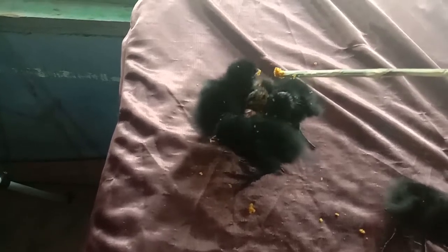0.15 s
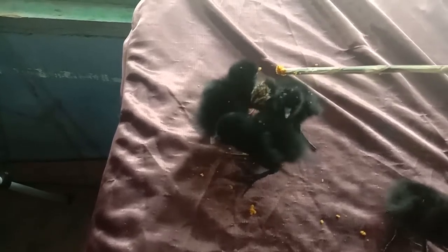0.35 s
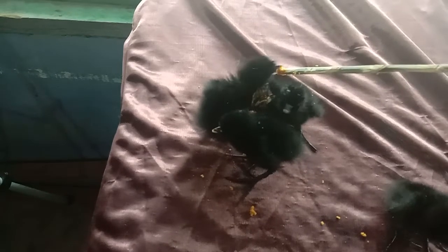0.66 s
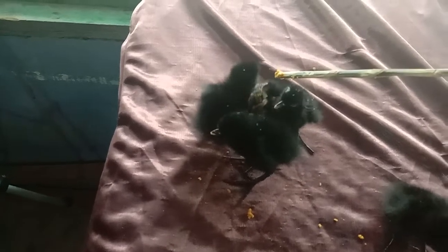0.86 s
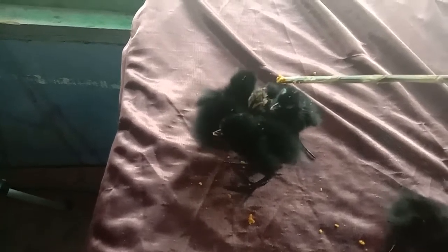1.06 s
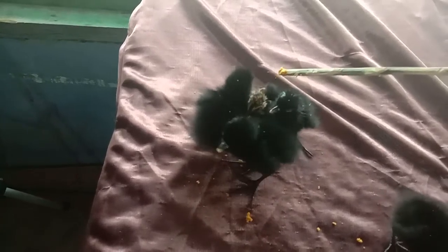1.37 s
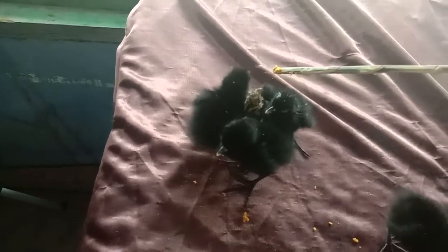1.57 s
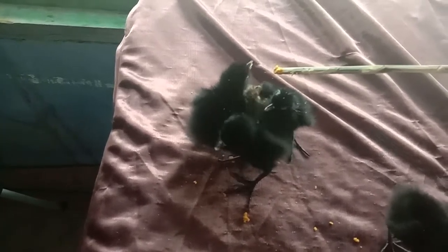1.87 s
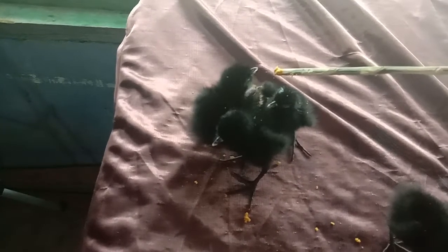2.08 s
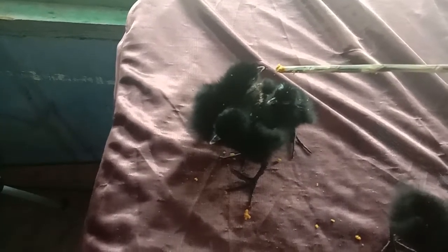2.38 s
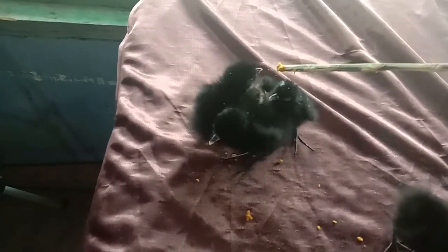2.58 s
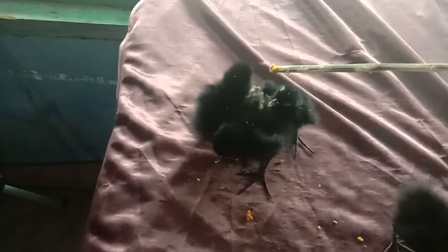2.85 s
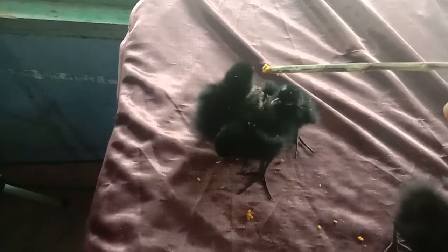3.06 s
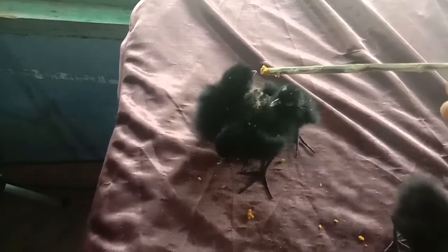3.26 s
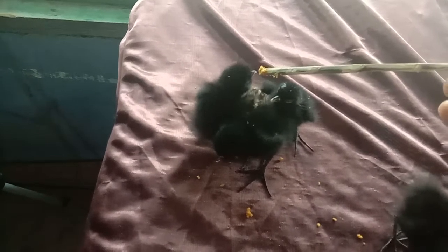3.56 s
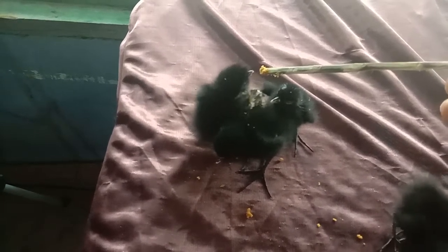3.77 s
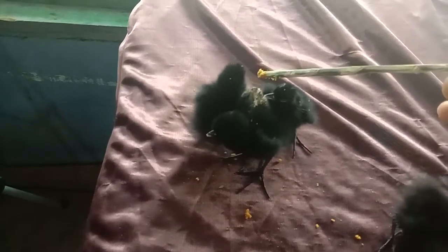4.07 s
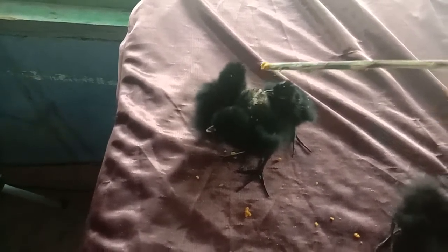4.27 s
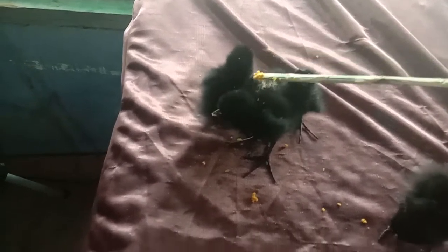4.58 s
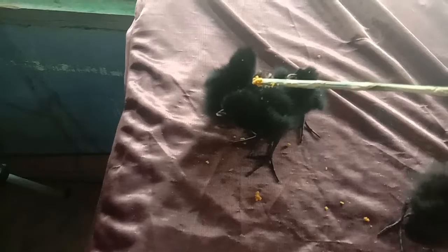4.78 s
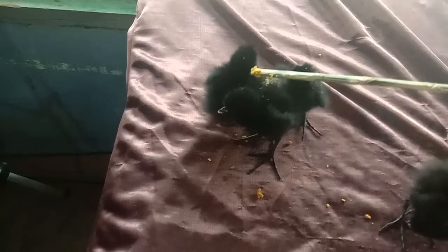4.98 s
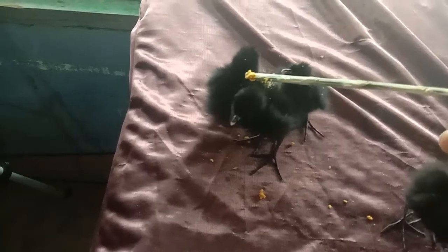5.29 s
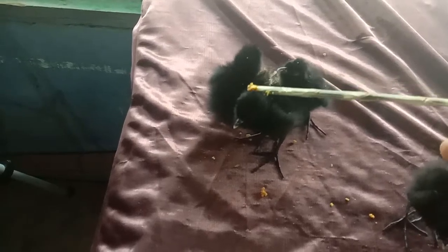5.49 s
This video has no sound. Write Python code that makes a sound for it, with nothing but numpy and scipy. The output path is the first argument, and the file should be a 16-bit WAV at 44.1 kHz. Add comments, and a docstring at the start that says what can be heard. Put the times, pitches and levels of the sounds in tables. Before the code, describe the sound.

High, sharp peeps from baby chicks carry on throughout, heard close up in a room. Loud falling calls come about once a second, singly or in small clusters, while quieter cheeps answer from slightly further off. Underneath are light shuffling and scratching on cloth, a faint throbbing hum and a dim, restless distant noise.

```python
"""Indoors, close to a phone, black hatchling chicks huddle on a cloth and beg for food.
Each peep is a whistle from a chick's voice box: it shoots up, peaks and sinks, turning raspy as it falls.
Soft cheeps and thin whistles fill the gaps, and feet and down rustle on the cloth.
Under them lie room rumble, a throbbing hum, a restless far-off din and a few faint low tones."""
import sys
import numpy as np
from scipy import signal
from scipy.fft import rfft, irfft
from scipy.io import wavfile
from scipy.ndimage import uniform_filter1d

SR = 44100
rng = np.random.default_rng(int(sys.argv[2]) if len(sys.argv) > 2 else 0)


def wav_record(signal):
    """Record a signal, one row per channel, as 16-bit PCM in the file named by sys.argv[1]."""
    frames = np.transpose(np.atleast_2d(signal))
    bounded = np.clip(frames, -1, 1)
    # unit amplitude maps onto the largest positive 16-bit level
    quanta = np.round(bounded * 32767).astype(np.int16)
    wavfile.write(sys.argv[1], SR, quanta)


N = 248724
TIME = np.arange(N) / SR
DROP_S = 0.028  # the quick fall that ends every peep
CLEAR_BEFORE_S, CLEAR_AFTER_S = 0.014, 0.035  # the voice is clean this long around its highest pitch


def undb(db):
    """Turn decibels into a gain to multiply by."""
    return 10 ** (np.asarray(db) / 20)


def unit(x):
    """Scale a signal to an average (rms) level of 1."""
    return x / np.sqrt(np.mean(x ** 2) + 1e-20)


def walk(rate):
    """A smooth random wander of size about 1; a higher rate [Hz] wanders faster."""
    spectrum = rfft(rng.standard_normal(N)) * np.exp(-(np.fft.rfftfreq(N, 1 / SR) / rate) ** 2)
    return unit(irfft(spectrum, N))


def gate(t, start, end, edge):
    """1 between start and end, 0 outside, with soft edges."""
    return np.sin(np.pi / 2 * np.clip(np.minimum(t - start, end - t) / edge, 0, 1)) ** 2


def arch(t, start, end):
    """An arch that rises from 0 to 1 and back between start and end."""
    return np.sin(np.pi * np.clip((t - start) / (end - start), 0, 1))


def bump(t, centre, width):
    """A bell-shaped curve of height 1."""
    return np.exp(-((t - centre) / width) ** 2)


def span(start, end):
    """The sample numbers and times of one call."""
    i = np.arange(max(int(start * SR), 0), min(int(end * SR), N))
    return i, TIME[i]


def noise_band(hz, width):
    """Noise around one pitch, passed twice through a resonance, at level 1."""
    b, a = signal.iirpeak(hz, hz / width, fs=SR)
    return unit(signal.lfilter(b, a, signal.lfilter(b, a, rng.standard_normal(N))))


def air(rumble_db=-59, hiss_db=-73):
    """Steady room rumble and a very faint hiss."""
    # tone colour of the rumble: (frequency [Hz], relative level [dB])
    rumble_shape = [(18, -50), (30, -66), (97, 6.5), (389, -11), (667, -15), (962, -9.5), (1240, -13.5),
                    (3000, -48), (3900, -53), (6600, -120)]
    hz, db = np.transpose(rumble_shape)
    f = np.fft.rfftfreq(N, 1 / SR) + 1
    colour = undb(np.interp(np.log(f), np.log(hz), db)) / (1 + (f / 3500) ** 4)
    hiss = undb(hiss_db) * rng.standard_normal(N)
    rumble = unit(irfft(rfft(rng.standard_normal(N)) * colour, N))
    return undb(rumble_db) * rumble + hiss


def hum(throb_db=-56, steady_db=-64, noise_db=-62):
    """A low hum that throbs unevenly about eight times a second."""
    beat = (1 + np.cos(2 * np.pi * 8.2 * TIME + .3 * walk(2))) ** 2
    throb = unit(beat * undb(3 * walk(7)) * np.sin(2 * np.pi * 92 * TIME + 1.5 * walk(7)))
    steady = np.sqrt(2) * np.sin(2 * np.pi * 101 * TIME + 0.89 * walk(5.1))
    return undb(throb_db) * throb + undb(steady_db) * steady + undb(noise_db) * noise_band(92.6, 158)


def lull():
    """A gain that dips briefly a few times, for the din and the shuffling."""
    # quiet moments: (time [s], half width [s], depth [dB])
    dips = [(2.15, .1, 1), (2.88, 0.026, 2.5), (3.372, 0.057, 6.5)]
    return undb(-sum(db * bump(TIME, time, width) for time, width, db in dips))


def swell(start, length, edge_s=0.0084):
    """The soft rise, hold and fall of one swell of the din."""
    return gate(TIME, start - edge_s, start + length + edge_s, 1.29 * edge_s)


def din(low_db=-57, high_db=-54, restless_db=3.5, low_swell_db=-1, high_swell_db=-3):
    """Far-off noise that swells in a low and a high group of flickering bands."""
    # noise bands of each group: (pitch [Hz], base width [Hz], relative level [dB])
    low_bands = [(499, 39, -7.5), (598.3, 37, 4.5), (676.6, 20, 3), (749.5, 19, 5.5), (877, 15.6, 4)]
    high_bands = [(1077, 53, -4), (1233, 67, 4.5), (1337, 32, -1.5), (1455, 89, 2), (1715, 99, -5.5),
                  (1845, 73, -1.5), (1955, 35, -18.5), (2080, 15, -6)]
    # swells of the low group: (start [s], length [s], relative level [dB], centre [Hz])
    low_swells = [(0.501, 0.044, -46, 577), (0.572, 0.032, -45, 660), (0.732, 0.065, -47.5, 750),
                  (0.783, 0.027, -47, 680), (0.948, 0.048, -45.5, 606), (1.225, 0.14, -44.5, 743),
                  (1.837, 0.04, -45, 795), (1.945, 0.092, -44, 663), (2.441, 0.067, -45, 696),
                  (2.692, 0.039, -43.5, 810), (3.426, 0.046, -46.5, 587), (3.599, 0.041, -47, 780),
                  (3.721, 0.037, -48, 627), (3.866, 0.054, -47, 677), (4.031, 0.03, -48, 800),
                  (4.131, 0.034, -45.5, 610), (4.417, 0.027, -46.5, 670), (4.498, 0.039, -46.5, 690),
                  (4.739, 0.051, -45.5, 615), (4.793, 0.065, -50.5, 564), (5.037, 0.043, -45.5, 620),
                  (5.331, 0.082, -47.5, 783), (5.417, 0.079, -46, 800)]
    # swells of the high group: (start [s], length [s], relative level [dB])
    high_swells = [(0.052, 0.038, -44.5), (0.582, 0.061, -42), (1.196, 0.043, -39.5), (1.555, 0.091, -45),
                   (1.66, 0.068, -43), (1.833, 0.072, -44.5), (2.375, 0.098, -46), (2.575, 0.071, -44),
                   (2.76, 0.054, -44.5), (3.575, 0.027, -39.5), (3.818, 0.038, -46), (4.003, 0.03, -41.5),
                   (4.072, 0.04, -44), (4.241, 0.043, -43.5), (4.342, 0.035, -42.5), (4.548, 0.026, -43.5),
                   (5.069, 0.04, -43.5), (5.283, 0.1, -44), (5.385, 0.044, -45), (5.46, 0.049, -51),
                   (5.606, 0.05, -40.5)]
    low, high = (undb(db + restless_db * walk(17.3)) * lull() for db in (low_db, high_db))
    centre_hz = 670 + 65 * walk(2.7)  # bands near this drifting centre stand out in the low group
    for start, length, db, hz in low_swells:
        on = swell(start, length)
        low = np.maximum(low, undb(db + low_swell_db) * on)
        centre_hz = centre_hz + on * (hz - centre_hz)
    for start, length, db in high_swells:
        high = np.maximum(high, undb(db + high_swell_db) * swell(start, length))
    out = 0
    for bands, gain, focus_hz, reach_hz in ((low_bands, low, centre_hz, 170), (high_bands, high, 1300, 1500)):
        body = 0
        for hz, width, db in bands:
            flicker = undb(db + 5.5 * walk(12)) / (1 + ((hz - focus_hz) / reach_hz) ** 4)
            body += flicker * noise_band(hz, 1.6 * width)
        # the bands trade energy while their sum follows the swell
        power = uniform_filter1d(body ** 2, size=2000)
        out += body / np.sqrt(power) * gain
    return out


def low_tones(sag=0.04):
    """Faint, unsteady tones that swell, sink a little and fade."""
    # the tones: (start [s], length [s], middle pitch [Hz], level [dB])
    tones = [(4.49, .14, 376, -44), (4.65, .14, 358, -49), (.46, .14, 510, -49), (.94, .07, 620, -44),
             (4.79, .11, 355, -54), (4.535, .07, 1100, -45), (4.75, .18, 586, -47), (5.04, .27, 140, -45),
             (5.02, .2, 232, -53), (5.08, .25, 195, -55)]
    out, flicker, waver = np.zeros(N), walk(33), walk(53)
    for start, length, hz, db in tones:
        pitch = hz * np.interp(TIME, [start, start + length], [1 + sag, 1 - sag])
        phase = 2 * np.pi * np.cumsum(pitch) / SR + waver / 2
        fade = gate(TIME, start, start + length, length / 3)
        out += np.sqrt(2) * undb(db + 2 * flicker) * fade * np.sin(phase)
    return out


def rustle(shuffle_db=-53.5, chatter_db=-58):
    """Chicks shuffle in random fits and scratch the cloth, with thin far-off cheeping behind."""
    # feet and down on the cloth: (middle time [s], length [s], centre [Hz], level [dB])
    scratches = [(1.645, 0.082, 3980, -47.5), (2.037, 0.038, 10300, -54.5), (2.136, 0.034, 5360, -55.5),
                 (3.48, 0.069, 4600, -52.5), (5.034, 0.034, 3820, -51.5), (5.087, 0.043, 6000, -47.5)]
    out = 0
    for hz in np.geomspace(2100, 14500, num=22):
        patches_db = 5.5 * walk(20)
        colour_db = -np.log2(hz / 2000) - 10 * (hz > 10500)  # higher bands are weaker
        out += undb(patches_db + colour_db) * noise_band(hz, hz / 10)
    crackle = undb(2.6 * walk(140))
    activity = undb(shuffle_db + 2 * walk(32)) * lull()
    out = unit(out * crackle) * activity
    grain = unit(undb(2 * walk(400)))
    for time, length, hz, db in scratches:
        fade = gate(TIME, time - length / 2, time + length / 2, length / 3)
        out += undb(db) * fade * grain * noise_band(hz, hz / 4)
    chatter = sum(noise_band(hz, 110) * undb(6 * walk(7)) for hz in (3350, 3650, 3800))
    return out + undb(chatter_db) * unit(chatter * activity)


def room(x, tail_db=-27, ring_s=0.25):
    """Sound bounces off nearby surfaces, then dies away in a short tail."""
    # close echoes: (delay [s], level [dB])
    echoes = [(.0023, -31), (.0061, -13), (0.0114, -11)]
    t = TIME[:SR // 2]
    tail = rng.standard_normal(len(t)) * undb(-60 * t / ring_s) * (t > .008)
    response = undb(tail_db) * tail / np.sqrt(np.sum(tail ** 2))
    for delay, db in echoes:
        response[int(delay * SR)] += undb(db)
    return x + signal.fftconvolve(x, response)[:N]


def soft_calls(calls, hoarse, gain_db, ends_db=-6.5):
    """Quiet calls with the beak nearly shut: a lone tone that breaks up when hoarse."""
    out, jitter, catch = np.zeros(N), walk(224), walk(20)
    for start, length, first_hz, last_hz, arch_hz, loudest, db in calls:
        end = start + length
        i, t = span(start, end)
        hz = np.interp(t, [start, end], [first_hz, last_hz]) + arch_hz * arch(t, start, end)
        phase = 2 * np.pi * np.cumsum(hz) / SR + hoarse * jitter[i]
        fade_db = np.interp(t, [start, start + length * loudest, end], [ends_db, 0, ends_db])
        size = np.sqrt(2) * gate(t, start, end, 0.0067) * undb(db + fade_db)
        out[i] += size * undb(7.4 * hoarse * catch[i]) * np.sin(phase)
    return undb(gain_db) * out


def peep_pitch(t, times, pitches, rest_hz=2480, half_step_s=0.0086):
    """The pitch climbs from rest to a peak, sags with one sudden step down, and drops back."""
    start, peak, step, end = times
    top_hz, end_hz, step_hz, climb_hz, sag_hz = pitches
    hz = np.interp(t, [start, peak, end, end + DROP_S],
                   [rest_hz, top_hz, end_hz + step_hz, rest_hz + step_hz])
    hz += climb_hz * arch(t, start, peak) + sag_hz * arch(t, peak, end)
    hz -= step_hz * (1 + np.tanh((t - step) / half_step_s)) / 2
    return uniform_filter1d(hz, size=570, mode="nearest")  # round off the corners


def peep_levels(t, times, levels, hz, onset_db=-49.5, cutoff_db=-63, pure_s=0.019):
    """Strength of the whistle and its octave: pressure builds in the climb and holds into the drop."""
    # how the throat colours the octave (twice the pitch): (frequency [Hz], gain [dB])
    throat = [(4500, 5), (6000, -4), (7300, 3.5), (8200, -0.5), (9000, 6), (9700, -0.5), (10500, 1)]
    start, peak, _, end = times
    peak_db, mid_db, end_db, climb_octave_db, sag_octave_db = levels
    climb = np.interp(t, [start, peak], [1, 0])
    sag = np.interp(t, [peak, end], [0, 1])
    drop = np.interp(t, [end, end + DROP_S], [0, 1])
    whistle_db = np.interp(t, [peak, (peak + end) / 2, end], [peak_db, mid_db, end_db])
    whistle_db += (onset_db - peak_db) * climb ** 0.95 + (cutoff_db - end_db) * drop ** 2.1
    octave_db = np.interp(t, [peak, peak + CLEAR_AFTER_S], [climb_octave_db, sag_octave_db])
    octave_db += np.interp(2 * hz, *np.transpose(throat))
    octave_db -= 6.5 * climb + 7.5 * sag + 3.5 * drop  # weaker towards both ends
    octave_db -= 8 * bump(t, peak + pure_s / 2, pure_s)  # a pure moment as the pitch turns over
    fade = np.sqrt(2) * gate(t, start, end + DROP_S, 0.006)
    return fade * undb(whistle_db), fade * undb(octave_db)


def roughness(t, peak, rasp_db, early_db=-3, grow_s=0.095, half_pitch_db=-18):
    """Amounts of rasp and half pitch: rough in the climb, clean at the peak, rougher through the sag."""
    # the voice slips into half pitch: (start [s], length [s], strength [dB])
    slips = [(.005, .025, -24), (2.33, .03, -24), (4.22, .11, -24)]
    early = (t > peak) * np.clip(1 - (t - peak - CLEAR_AFTER_S) / grow_s, 0, 1)
    clean = gate(t, peak - CLEAR_BEFORE_S, peak + CLEAR_AFTER_S, 0.0053)
    rasp = undb(rasp_db + early_db * early) * (1 - clean)
    slipping = sum(undb(db) * gate(t, start, start + length, 0.001) for start, length, db in slips)
    return rasp, undb(half_pitch_db) * rasp + slipping


def peeps(flutter_hz=788, wobble_hz=30.75, third_db=-20, fourth_db=-42):
    """The voice box whistles with a strong octave; its two sides beat, and it slips into half pitch."""
    # loud peeps: (start [s], peak [s], step down [s], end of sag [s],
    #   peak pitch [Hz], end pitch [Hz], step size [Hz], arch of climb [Hz], arch of sag [Hz],
    #   peak level [dB], midway level [dB], end level [dB],
    #   base octave level in climb [dB], base octave level in sag [dB], rasp [dB])
    calls = [(-0.124, -0.035, 0.054, 0.07, 4240.0, 3690.0, 140.0, -80.0, 180.0, -32.0, -30.0, -25.0, -45.0, -36.0, -27.0),
             (0.292, 0.359, 0.373, 0.546, 5440.0, 3540.0, 250.0, 210.0, -260.0, -24.0, -25.0, -37.0, -39.0, -45.0, -23.0),
             (0.302, 0.426, 0.443, 0.526, 5080.0, 4390.0, 610.0, 580.0, 90.0, -25.0, -33.0, -32.0, -58.0, -65.0, -18.0),
             (0.541, 0.59, 0.692, 0.828, 4190.0, 3060.0, 260.0, 380.0, 140.0, -31.0, -32.0, -50.0, -53.0, -38.0, -23.0),
             (1.386, 1.449, 1.48, 1.595, 5430.0, 3550.0, 350.0, -260.0, -80.0, -19.0, -25.0, -36.0, -37.0, -34.0, -19.0),
             (2.269, 2.315, 2.349, 2.428, 4560.0, 3890.0, 130.0, -40.0, 50.0, -27.0, -25.0, -27.0, -56.0, -35.0, -23.0),
             (2.596, 2.658, 2.682, 2.816, 5260.0, 3550.0, 550.0, -250.0, 40.0, -20.0, -28.0, -43.0, -34.0, -32.0, -18.0),
             (3.015, 3.075, 3.205, 3.212, 4450.0, 4170.0, 210.0, 180.0, 40.0, -41.0, -35.0, -34.0, -66.0, -67.0, -22.0),
             (3.859, 3.93, 3.944, 4.107, 5320.0, 3950.0, 290.0, -300.0, -50.0, -21.0, -36.0, -37.0, -35.0, -37.0, -21.0),
             (4.064, 4.154, 4.269, 4.348, 4900.0, 3580.0, 0.0, 80.0, -190.0, -33.0, -31.0, -36.0, -45.0, -41.0, -24.0),
             (4.166, 4.208, 4.272, 4.305, 4340.0, 3720.0, 130.0, 10.0, -50.0, -33.0, -29.0, -33.0, -58.0, -40.0, -28.0),
             (4.504, 4.556, 4.642, 4.71, 4750.0, 3630.0, 110.0, 390.0, -30.0, -27.0, -31.0, -36.0, -54.0, -46.0, -19.0),
             (5.147, 5.208, 5.239, 5.361, 5230.0, 3510.0, 480.0, -170.0, 260.0, -19.0, -21.0, -37.0, -34.0, -30.0, -23.0)]
    out = np.zeros(N)
    flutter = 2 * undb(1.5) * np.cos(2 * np.pi * flutter_hz * TIME + 2.3 * walk(80))  # the two sides beat
    wobble = wobble_hz * walk(23.2)
    shimmer, jitter = flutter + walk(900), .7 * walk(900)
    tremor, waver = walk(130), walk(110)
    overtone_flicker = undb(1.8 * walk(140) + .7 * walk(60))
    for row in calls:
        times, pitches, levels, rasp_db = row[:4], row[4:9], row[9:14], row[14]
        i, t = span(times[0], times[-1] + DROP_S)
        hz = peep_pitch(t, times, pitches) + wobble[i]
        whistle, octave = peep_levels(t, times, levels, hz)
        rasp, half_pitch = roughness(t, times[1], rasp_db)
        # pushed hard the whistle locks steady; blown softly it trembles
        slack = 1 / (1 + (whistle / .035) ** 2)
        phase = 2 * np.pi * np.cumsum(hz) / SR + rasp * jitter[i] + .7 * slack * waver[i]
        # the throat passes the upper overtones only while the pitch is low
        passed = undb(-9 * (hz - 4000) / 1000).clip(0, 2)
        upper = passed * (undb(third_db) * np.sin(3 * phase) + undb(fourth_db) * np.sin(4 * phase))
        voice = whistle * np.sin(phase) + octave * overtone_flicker[i] * (np.sin(2 * phase) + upper)
        voice += half_pitch * whistle * (np.sin(3 * phase / 2) + .4 * np.sin(5 * phase / 2))
        out[i] += (1 + rasp * shimmer[i]) * undb(1.9 * slack * tremor[i]) * voice
    return out


def scene():
    """The chicks in their room, over the background; the soft cheeps come from further off."""
    # soft cheeps: (start [s], length [s], first pitch [Hz], last pitch [Hz], arch [Hz],
    #   loudest point [share of length], relative level [dB])
    cheep_calls = [(.1, 0.23, 3880, 3820, 186, 0.32, -44.5), (.9, 0.13, 3860, 3763, 127, 0, -43),
                   (1.1, 0.1, 4070, 3260, 2, 0.7, -35), (1.19, 0.1, 3630, 3920, -6, 0.7, -44),
                   (1.71, 0.24, 3410, 2850, 401.5, 0.26, -43.5), (2.45, 0.21, 3810, 3600, -46, 0.6, -41.5),
                   (2.915, 0.079, 3756, 3410, 48, 0.05, -40.5), (3.05, .22, 3534, 3184, 373.5, 0.17, -40.5),
                   (3.44, 0.096, 3750, 3640, -63, 0.5, -45.5)]
    # thin, clean whistles: same columns
    whistle_calls = [(3.68, 0.19, 2870, 4050, -17.5, 0.56, -54), (4.36, 0.18, 2903, 3380, -72, 0.96, -51.5),
                     (5.38, 0.33, 3680, 3700, -20, 0.5, -51.5), (5.5, 0.22, 2970, 3430, -56, 0.4, -52)]
    cheeps = room(soft_calls(cheep_calls, hoarse=.7, gain_db=-5), tail_db=-6)
    whistles = soft_calls(whistle_calls, hoarse=.12, gain_db=3)
    chicks = room(peeps() + whistles) + cheeps
    return (chicks + rustle() + hum() + din() + low_tones() + air())[None]


def record(dry):
    """The phone cuts off the highest treble, above 15700 Hz."""
    return signal.sosfilt(signal.ellip(10, .1, 80, 15700, fs=SR, output="sos"), dry)


dry = scene()
out = record(dry)
wav_record(out)
```